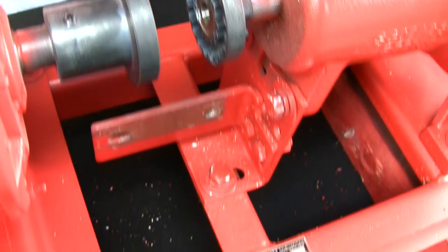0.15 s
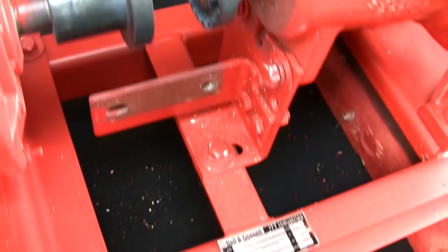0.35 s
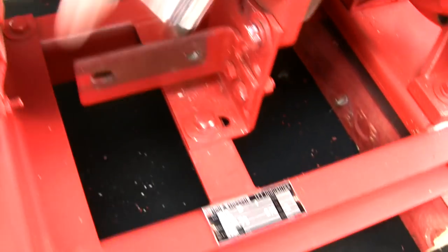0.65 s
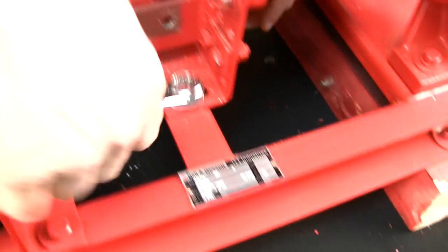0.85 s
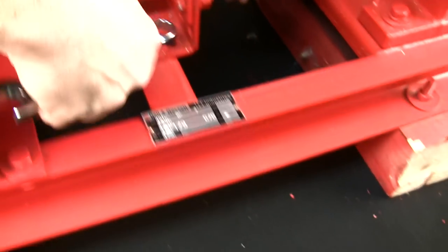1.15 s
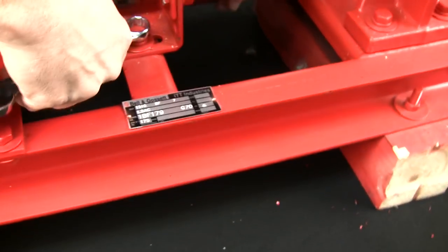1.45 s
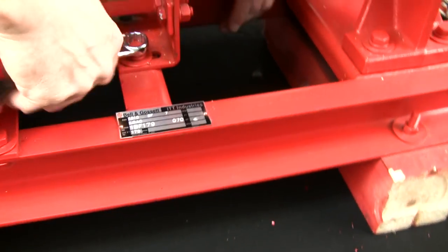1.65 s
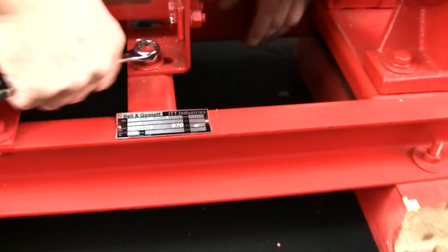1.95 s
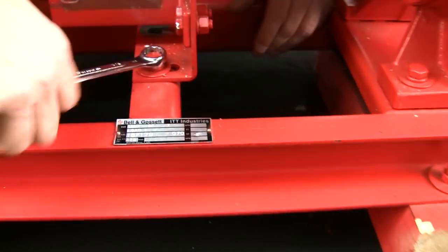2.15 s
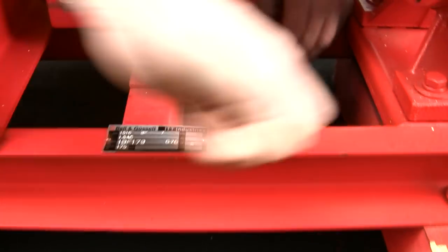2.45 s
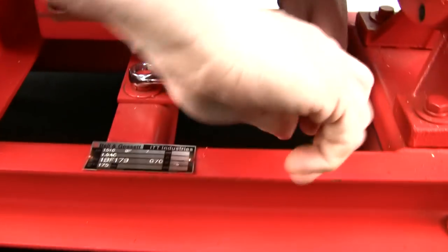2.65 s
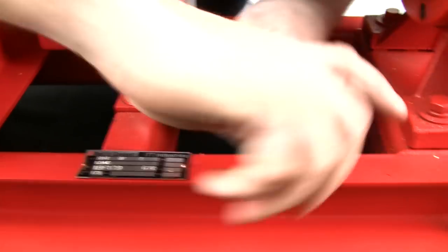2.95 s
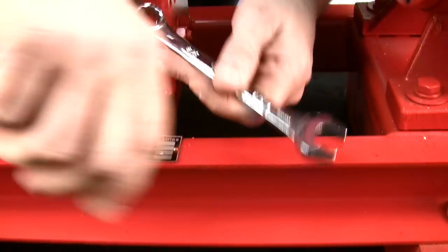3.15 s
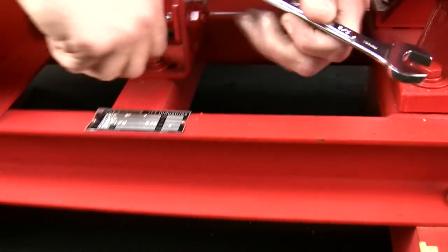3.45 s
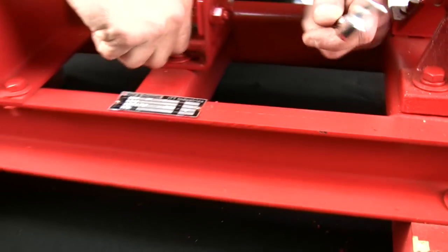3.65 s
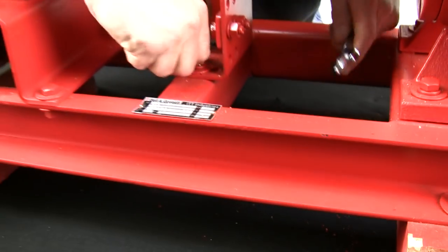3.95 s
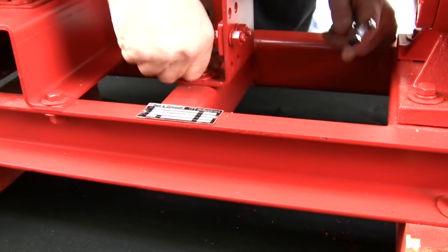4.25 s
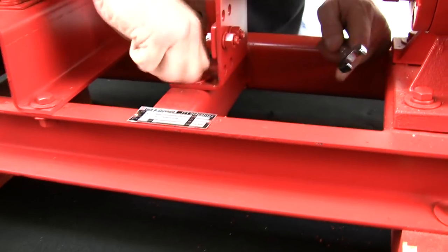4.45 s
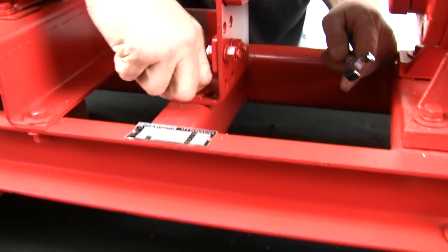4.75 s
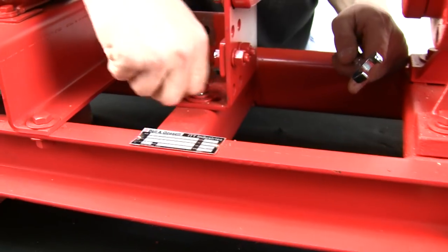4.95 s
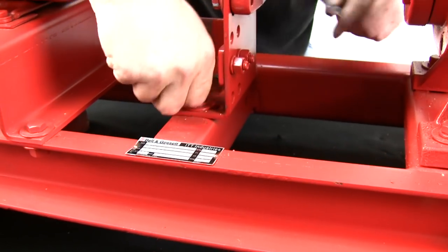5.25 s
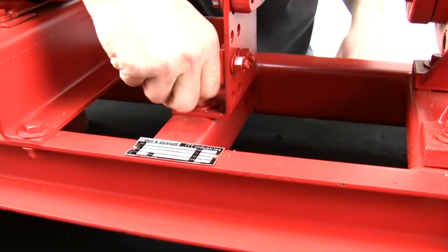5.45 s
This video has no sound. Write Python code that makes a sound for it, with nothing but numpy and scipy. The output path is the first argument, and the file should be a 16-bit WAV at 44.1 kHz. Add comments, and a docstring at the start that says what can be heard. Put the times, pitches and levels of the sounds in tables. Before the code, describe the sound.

Close to a handheld microphone, a steel wrench taps a bolt, then clanks sharply against a metal frame. A scrape and a lighter knock precede the loudest burst of ringing blows, which overloads slightly and trails off in a brief rattle. A single clank, gritty rubbing and faint taps finish the work. The workshop adds a short echo, with low handling rumble and faint machines humming behind.

```python
"""Ringing knocks and gritty scrapes of a wrench on the nuts of a painted steel pump base in a quiet workshop.
Each knock rings the frame's modes and jolts the microphone of a close camera; the loudest overload it. After
the loud blows a gritty rattle of the wrench dies away and a brief drone sounds. Steel and skin scrape on paint,
and a loose nut sings on its thread. The handled camera rumbles, and the shop adds a short tail over distant
machine hum."""
import sys
import numpy as np
from scipy import signal
from scipy.io import wavfile
from scipy.ndimage import uniform_filter1d

SR = 44100
rng = np.random.default_rng(int(sys.argv[2]) if len(sys.argv) > 2 else 0)


def materialize(psi):
    """Save the field psi as 16-bit PCM at rate SR to the path in sys.argv[1].

    A 1-D psi becomes a single channel; in a 2-D psi each row is a channel.
    """
    bounded = np.clip(np.atleast_2d(psi).T, -1, 1)
    quanta = np.round(bounded * 32767).astype(np.int16)
    wavfile.write(sys.argv[1], SR, quanta)


N = 247842

# wrench blows: (time [s], level [dB], struck spot's pitch [Hz], hardness [dB/octave], camera jolt [dB])
KNOCKS = [(1.3137, -21.5, 1250, -6, -32), (1.323, -25.5, 1300, -2.9, -35), (1.374, -34, 2815, -1.5, -39),
          (1.453, -48, 1300, -0.2, -48), (1.6739, -7, 2260, -2, -16), (1.7378, -27, 1040, -6.5, -36),
          (1.767, -23.5, 2146, 9, -41.5), (1.7723, 1.5, 3790, 2, -13), (1.7797, -5.5, 505, -7, -31.5),
          (1.793, -12, 1590, -4.5, -25.5), (1.8844, -26.5, 1640, -1.5, -36), (2.6094, -18.5, 1227, -5, -25),
          (3.003, -42, 1237, -1.5, -55.5), (3.11, -36.5, 2610, -3, -52.5), (3.1315, 0, 4030, 2, -6),
          (3.1323, -7, 7070, 2.5, -25), (3.1599, 1.5, 1608, 1, -17), (3.1657, 1, 1719, 3.5, -43),
          (3.1744, -1, 4370, 4, -15), (3.1875, -9, 1435, -1, -27), (3.2134, -9, 3560, 0.3, -28),
          (3.2395, -13, 2390, -1, -31), (4.049, -45.5, 1256, -7.5, -50.5), (4.329, -4, 2035, 1, -11),
          (4.4306, -33, 1440, -1, -46), (4.5122, -33, 1656, -0.5, -34), (4.5907, -46, 3980, 4, -41),
          (4.7165, -30.5, 2140, -3.5, -40.5), (4.866, -41.5, 2102, -5, -50), (4.9209, -35, 1280, -1.5, -40),
          (5.1218, -36.5, 2100, -5, -45.5), (5.1569, -34, 2030, -5, -39), (5.2006, -43, 1927, -4, -58),
          (5.333, -47.5, 2910, -4, -64), (5.515, -45.5, 1623, -6, -45)]
# modes of the steel base: (frequency [Hz])
FRAME_HZ = np.array([505, 677, 969, 1044, 1230, 1287, 1437, 1546, 1628, 1684, 1852, 2035, 2185, 2357, 2466, 2640, 2815, 2917, 3275, 3364, 3450, 3682, 4030, 4170, 4340, 4499, 4813, 5195, 5970, 7100])
# nominal decay of each mode: (t60 [s])
FRAME_T60_S = np.array([0.51, 0.14, 0.15, .1, 0.11, .11, 0.13, .24, 0.15, 0.22, .2, 0.14, 0.13, 0.11, 0.22, 0.19, 0.11, 0.15, 0.093, 0.37, 0.22, 0.19, 0.056, 0.064, .09, 0.17, 0.15, 0.057, 0.11, 0.088])
# the hand moves from bolt head to bracket, then to loose nut: (time [s])
MOVES_S = [2.9, 4.0]


def knock(at_s, level_db, spot_hz, hard_db, ring_scale, crack_db, tick_db):
    """Wrench blow: modes near the spot's pitch ring most; dense high modes crack; first touch ticks."""
    # crack spectrum: (frequency [Hz], level [dB])
    crack_spectrum = [(150, -38), (300, -25.5), (544, -6), (974, -12.5), (1300, -6), (2020, -2), (3000, -8),
                      (4300, -7), (5500, -8), (7100, -11), (8600, -15), (10500, -12.5), (13000, -24),
                      (15500, -34.5)]
    # nominal crack decay: (frequency [Hz], t60 [s])
    crack_t60_s = [(300, 0.026), (1500, 0.16), (5000, 0.058), (12000, 0.039)]

    def crack_shape_db(hz, s):
        fade_db = 60 * (s / read(crack_t60_s, hz) / ring_scale) ** 1.266  # jaws chatter before it dies
        return read(crack_spectrum, hz) + contact_db(hz, hard_db) - fade_db

    t = np.arange(SR // 2) / SR
    attack_s, tick_s, onset = 0.00039, 0.0013, slice(0, 300)
    near_db = 11.9 * np.exp(-(np.log2(FRAME_HZ / spot_hz) / 0.12) ** 2)
    heavy_db = .5 * level_db * (FRAME_HZ[0] / FRAME_HZ) ** 2  # light taps cannot move the long beams
    mode_db = place_db(at_s) + near_db + heavy_db + contact_db(FRAME_HZ, hard_db)
    ring = frame_ring(mode_db, FRAME_T60_S * ring_scale, t)
    crack = shaped(rng.standard_normal(len(t)), crack_shape_db, size=128)
    tick = np.diff(rng.standard_normal(len(t) + 2), 2) * np.exp(-t / tick_s)
    steel = ring / ring[onset].std() + gain_of(crack_db) * crack / crack[onset].std()
    steel += gain_of(tick_db + 2 * hard_db) * tick
    return gain_of(level_db - 7.5) * steel * (1 - np.exp(-t / attack_s))


def blow_kind(at_s, level_db, rebound_s=.097, heavy_db=-18):
    """How the wrench lands: (ring time scale, crack [dB], tick [dB])."""
    if any(0 < at_s - s < rebound_s and db > max(level_db, heavy_db) for s, db, *_ in KNOCKS):
        return .47, -4.5, -30  # rebound: jaws still rest on the steel
    if level_db > heavy_db:
        return .66, -1, -14  # free blow
    return .73, -5.5, -23.5  # light tap of a loose wrench


def contact_db(hz, hard_db):
    """Blow spectrum: a soft contact lasts longer, so it tilts down and its treble shelf starts lower."""
    shelf_hz = 7000 * 2 ** (hard_db / 4.3)
    tilt_db = 1.1 * hard_db * np.log2((hz + 100) / 2000)
    return tilt_db + 10 * np.log10(.03 + 1 / (1 + (hz / shelf_hz) ** 8))


def place_db(at_s):
    """How strongly each mode answers where the hand is working."""
    # rows bolt head, bracket, loose nut; a column per mode: (level [dB])
    mode_db = np.array([[-17.0, -12.0, -9, -8.5, -9.0, 0.0, -9.5, -5.5, -7, -11, -14, -3, -15.0, -5.0, -11.0, -11.5, -23.0, -29.5, -23.5, -50.5, -32.0, -25, -20.5, -7, -30.0, -22.5, -25.0, -21.5, -20, -18],
               [-17.5, -26, -10.5, -26, -4.5, 10.5, 5.5, -8.0, -4.5, -5, 3.0, -21.5, -9, -3.5, 2.0, -2.5, -7.0, -1, -29.5, -5.5, -7.5, -19.5, 5.5, -25.5, -6, -8.5, -15.5, -19.5, -18.5, -8],
               [-51.0, -24.5, -31.5, -15, -17.0, 4.5, 5, -3.0, -8.0, 0.0, -6.5, -3, -3.5, -9.5, -9, -9.0, -17.0, -4.5, -6.5, -12.5, -5, -14, -25, -0.5, 2, 4, -11.5, -1, 0, -27.5]])
    return mode_db[np.searchsorted(MOVES_S, at_s)]


def frame_ring(mode_db, t60_s, t):
    """Modes as dying sines; each has a weaker twin, detuned at random per blow, so the ring wavers."""
    phase, twin_phase, detune = rng.random((len(mode_db), 3)).T[:, :, None]
    cycles = FRAME_HZ[:, None] * t
    mode = np.sin(2 * np.pi * (cycles + phase))
    twin = gain_of(-3.5) * np.sin(2 * np.pi * (cycles * (1 + .07 * (detune - .5)) + twin_phase))
    decay = gain_of(mode_db[:, None] - 60 * t / t60_s[:, None])
    return (decay * (mode + twin)).sum(0)


def scrape_or_rattle(start_s, strongest_s, end_s, level_db, tilt_db_per_octave):
    """Scrape on paint or wrench rattle: uneven grit hisses, rings the damped frame, makes the nut sing."""
    ring_share, catches_per_s, nut_loose_s = 0.44, 250, 4.42
    t = np.arange(start_s, end_s, 1 / SR)
    grit = rng.standard_normal(len(t)) * flutter(len(t), depth_db=1.8, window=150)
    grit += 4 * rng.standard_normal(len(t)) * (rng.random(len(t)) < catches_per_s / SR)
    damped_frame = frame_ring(place_db(start_s) / 3 - FRAME_HZ / 600, FRAME_T60_S / 3, np.arange(4000) / SR)
    ring = unit_rms(signal.oaconvolve(grit, damped_frame)[:len(t)])
    # gritty hiss: (frequency [Hz], level [dB])
    hiss_spectrum = [(180, -54), (300, -30), (1250, -7.5), (1490, -6), (3860, -10), (5090, -16),
                     (9800, -29.5), (14000, -62), (15000, -61.5)]
    hiss = coloured(grit, hiss_spectrum)
    rasp = ring_share * ring + (1 - ring_share) * hiss
    rasp = shaped(rasp, lambda hz, _: tilt_db_per_octave * np.log2((hz + 200) / 2000))
    swell = np.sin(np.interp(t, [start_s, strongest_s, end_s], [0, np.pi / 2, np.pi]))
    nut_db = -21 if start_s > nut_loose_s else -50
    nut = gain_of(nut_db) * unit_rms(resonate(grit, hz=9550, width_hz=130)) * swell ** 4
    return gain_of(level_db) * (rasp + nut) * swell ** 2


def drone(length_s=.25, rise_s=0.035, start_hz=743, sag_hz_per_s=120, level_db=-40.5, fade_db=25):
    """Brief fading drone: noise in one narrow, sinking resonance and a few steady ones."""
    # steady resonances: (frequency [Hz], stage width [Hz], level [dB])
    bands = [(2783, 137, -4), (4800, 340, -16.5), (5256, 320, -31), (6050, 200, -29.5)]
    t = np.arange(0, length_s, 1 / SR)
    noise = rng.standard_normal(len(t))
    tone = unit_rms(resonate(noise, start_hz - sag_hz_per_s * t, width_hz=43))
    tone += sum(gain_of(db) * steep_band(noise, hz, width_hz) for hz, width_hz, db in bands)
    envelope = gain_of(level_db - fade_db * (t / length_s) ** 2) * np.minimum(t / rise_s, 1)
    return envelope * tone * signal.windows.tukey(len(t), .2)


def jolt(at_s, peak_db, bass_cut_hz=21):
    """Short push on the microphone; its bass cut makes it swing back."""
    # push from bolt head, bracket, loose nut: (time constant [s])
    push_s = [.0036, 0.0021, 0.0027]
    age = np.arange(SR // 5) / SR / push_s[np.searchsorted(MOVES_S, at_s)]
    bass_cut = signal.butter(3, bass_cut_hz, "high", fs=SR, output="sos")
    push = signal.sosfilt(bass_cut, age * np.exp(-age))
    return gain_of(peak_db) * push / push.max()


def handling(shake_db=-27, upper_shake_db=-6, fade_db_per_s=54.5):
    """The handled camera rumbles in two bands and goes on shaking after each knock."""
    # rumble: (time [s], low band [dB], upper band [dB])
    rumble = [(0.0, -66, -87), (0.3, -58.5, -63), (0.5, -62, -51.5), (1.3, -59, -55), (1.65, -55.5, -63),
              (2.3, -53, -60.5), (2.901, -50, -53), (3.601, -56.5, -51), (4.1, -57, -59),
              (4.899, -61.5, -63), (5.62, -57, -57.5)]
    times_s, low_db, upper_db = np.transpose(rumble)
    t = np.arange(N) / SR
    shake = np.max([(t > at_s) * gain_of(jolt_db + shake_db - fade_db_per_s * abs(t - at_s))
                    for at_s, *_, jolt_db in KNOCKS], axis=0)
    lumps = flutter(N, depth_db=1.0, window=900)
    low = steep_band(rng.standard_normal(N), hz=27, width_hz=60)
    upper = steep_band(rng.standard_normal(N) * lumps, hz=130, width_hz=450)
    low_gain = np.hypot(gain_of(np.interp(t, times_s, low_db)), shake)
    upper_gain = np.hypot(gain_of(np.interp(t, times_s, upper_db)), gain_of(upper_shake_db) * shake)
    return low_gain * low + upper_gain * upper


def shop_tail(x, level_db=-18):
    """Workshop reflections: sparse taps of random sign, each band dying at its own speed."""
    # room decay: (frequency [Hz], t60 [s])
    t60_s = [(250, 0.45), (700, 0.73), (1500, 0.68), (3000, 0.55), (6000, 0.37), (9000, 0.31), (13000, 0.2)]
    # tail colour: (frequency [Hz], level [dB])
    colour = [(300, 0.5), (1200, -5), (5000, -8.5), (9000, -5), (14000, -10)]
    taps = np.zeros(SR)
    slots = np.arange(300, SR - 20, 20)
    taps[slots + rng.integers(0, 20, len(slots))] = rng.choice([-1., 1.], len(slots))
    tail = shaped(taps, lambda hz, s: read(colour, hz) - 60 * s / read(t60_s, hz))
    return gain_of(level_db) * signal.fftconvolve(x, tail / np.linalg.norm(tail))[:N]


def machine_hum(wide_db=-56, bands_db=-67):
    """Distant machines: wide noise with a few resonances, swelling slowly."""
    # machines and hiss: (frequency [Hz], level [dB])
    spectrum = [(15, -28), (25, -1), (59, -6.5), (215, -16.5), (274, -12.5), (509, -14.5), (722, -9.5),
                (945, -15), (1140, -15.5), (1570, -11.5), (2060, -22), (3170, -25), (5730, -31),
                (13500, -32), (15500, -54.5)]
    # hum resonances: (frequency [Hz], width [Hz], relative level [dB])
    peaks = [(791.5, 45, 3), (1398, 27, -1), (2310, 120, -9.5), (3150, 200, -14.5)]
    swell = flutter(N, depth_db=0.47, window=9000)
    wide = coloured(rng.standard_normal(N), spectrum, size=2048)
    bands = sum(gain_of(db) * unit_rms(resonate(rng.standard_normal(N), hz, width_hz))
                for hz, width_hz, db in peaks)
    return swell * (gain_of(wide_db) * wide + gain_of(bands_db) * bands)


def side_hiss(level_db=-76):
    """Faint hiss for the stereo side signal."""
    # hiss: (frequency [Hz], level [dB])
    spectrum = [(59, -35), (100, -4), (1800, -21), (4280, -5.5), (13700, 0), (15500, -23)]
    return gain_of(level_db) * coloured(rng.standard_normal(N), spectrum)


def gain_of(db):
    return 10 ** (np.asarray(db) / 20)


def unit_rms(x):
    return x / np.sqrt(np.mean(x ** 2) + 1e-20)


def flutter(n, depth_db, window):
    """Random gain, smoothed over window samples."""
    return gain_of(depth_db * unit_rms(uniform_filter1d(rng.standard_normal(n), window)))


def read(points, hz):
    points_hz, values = np.transpose(points)
    return np.interp(np.log(hz + 1), np.log(points_hz + 1), values)


def add(mix, at_s, sound):
    part = mix[round(at_s * SR):][:len(sound)]
    part += sound[:len(part)]


def shaped(x, db_at, size=256):
    """Weights the short-time spectra of x by db_at(frequency [Hz], time [s])."""
    frames = dict(nperseg=size, noverlap=size * 3 // 4)
    hz, t, spectra = signal.stft(x, SR, **frames)
    return signal.istft(spectra * gain_of(db_at(hz[:, None], t[None])), SR, **frames)[1][:len(x)]


def coloured(x, spectrum, size=256):
    return unit_rms(shaped(x, lambda hz, _: read(spectrum, hz), size))


def resonate(x, hz, width_hz):
    """Resonance that can glide: shift hz down to zero, smooth, shift back."""
    carrier = np.exp(2j * np.pi * np.cumsum(hz * np.ones(len(x))) / SR)
    pole = np.exp(-np.pi * width_hz / SR)
    return 2 * (carrier * signal.lfilter([1 - pole], [1, -pole], x / carrier + 1e-18)).real


def steep_band(x, hz, width_hz):
    return unit_rms(resonate(resonate(x, hz, width_hz), hz, width_hz))


def scene():
    """Wrench work, camera and shop; both microphone ports hear nearly the same sound."""
    # scrapes and, at 3.26 s, the wrench's gritty rattle dying away after the loud blows: # (start [s],
    # strongest [s], end [s], level [dB], tilt [dB/octave])
    rasps = [(.38, 0.517, .66, -49, -5), (.62, 0.89, 1.2, -53.5, -3), (2.25, 2.288, 2.46, -49, 0),
             (2.331, 2.437, 2.5, -45.5, 0), (2.457, 2.47, 2.53, -37, 0.5), (2.602, 2.612, 2.67, -49, 6.5),
             (3.26, 3.323, 3.62, -41, -1.5), (3.82, 3.951, 4.25, -58.5, -4.5),
             (4.35, 4.375, 4.41, -23.5, -1.5), (4.43, 4.5, 4.52, -53, 7), (4.5, 4.516, 4.63, -39, -1.7),
             (4.75, 4.792, 4.85, -35, -2.5), (4.85, 4.888, 4.92, -52.5, -2), (5.151, 5.17, 5.21, -54.5, 9),
             (5.33, 5.378, 5.47, -57, -5), (5.47, 5.51, 5.58, -51, -5)]
    # bumps on the camera: (time [s], peak [dB])
    bumps = [(0.8953, -36), (1.027, -38.5), (1.05, -42), (1.8406, -28), (4.493, -33.5), (4.57, -34),
             (4.576, -34.5)]
    work, jolts = np.zeros(N), np.zeros(N)
    for at_s, level_db, spot_hz, hard_db, jolt_db in KNOCKS:
        add(work, at_s, knock(at_s, level_db, spot_hz, hard_db, *blow_kind(at_s, level_db)))
        add(jolts, at_s, jolt(at_s, jolt_db))
    for at_s, peak_db in bumps:
        add(jolts, at_s, jolt(at_s, peak_db))
    for start_s, *shape in rasps:
        add(work, start_s, scrape_or_rattle(start_s, *shape))
    add(work, at_s=3.36, sound=drone())
    mid = work + shop_tail(work) + jolts + handling() + machine_hum()
    side = side_hiss()
    return np.array([mid + side, mid - side])


def record(dry, edge_hz=15700):
    """Hard overload at full scale, then the band limit."""
    low_pass = signal.firwin(511, edge_hz, window=("kaiser", 9), fs=SR)
    return signal.oaconvolve(np.clip(dry, -1, 1), low_pass[None], "same")


dry = scene()
out = record(dry)
materialize(out)
```